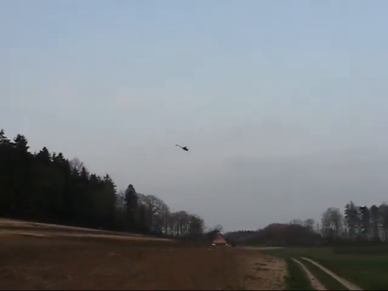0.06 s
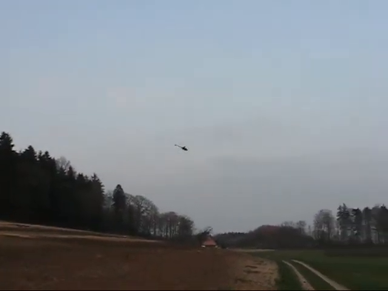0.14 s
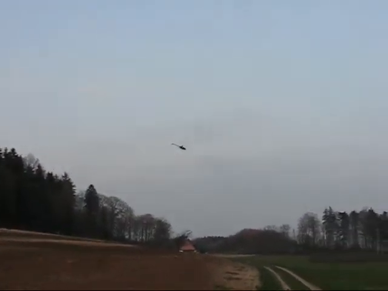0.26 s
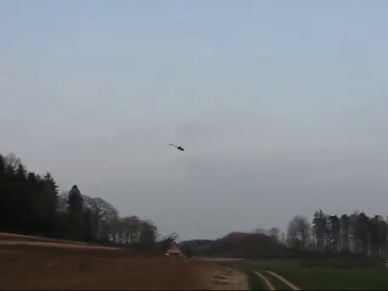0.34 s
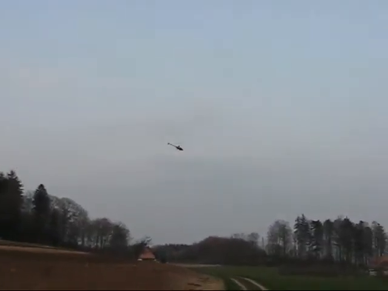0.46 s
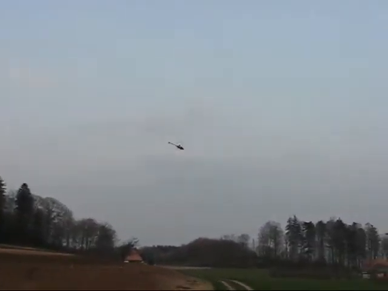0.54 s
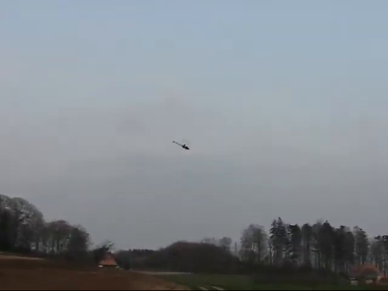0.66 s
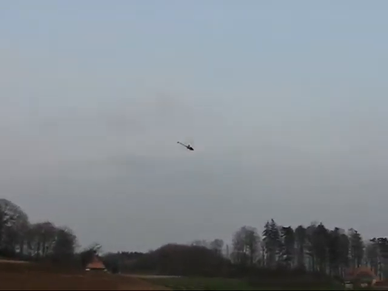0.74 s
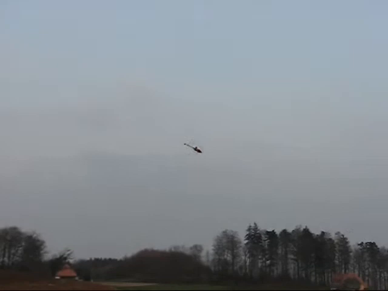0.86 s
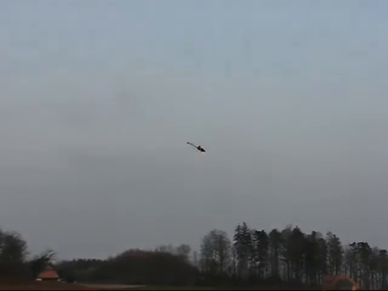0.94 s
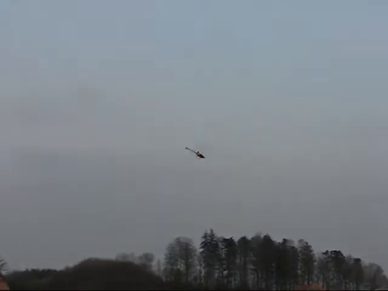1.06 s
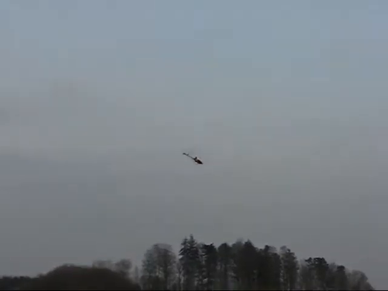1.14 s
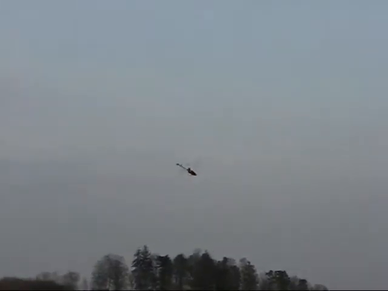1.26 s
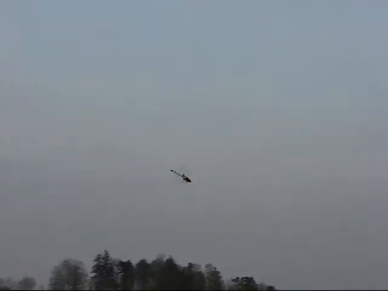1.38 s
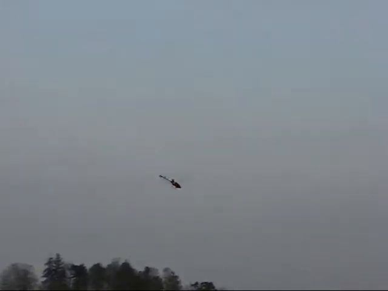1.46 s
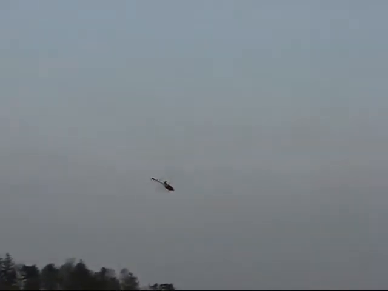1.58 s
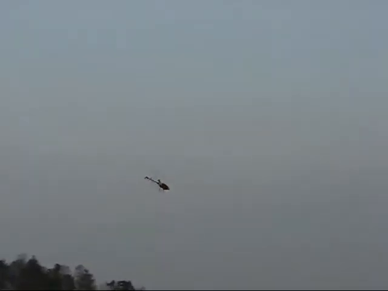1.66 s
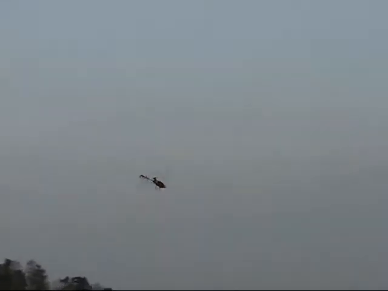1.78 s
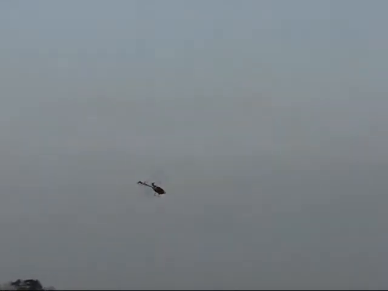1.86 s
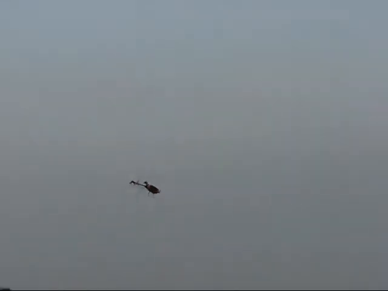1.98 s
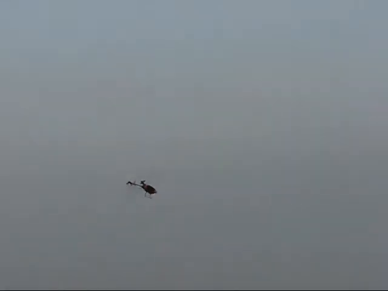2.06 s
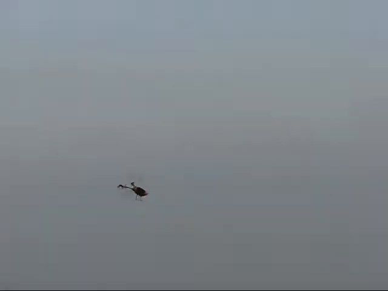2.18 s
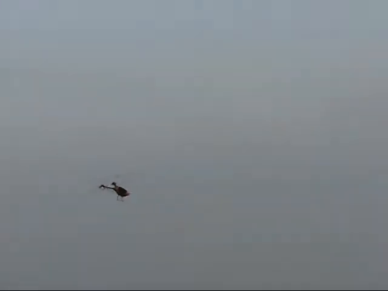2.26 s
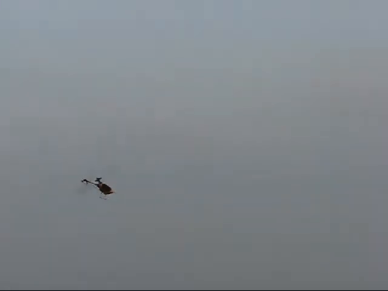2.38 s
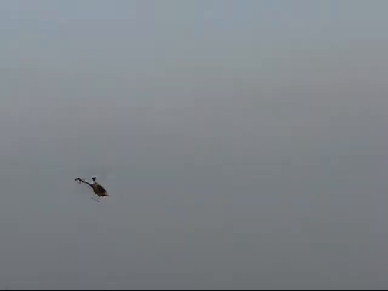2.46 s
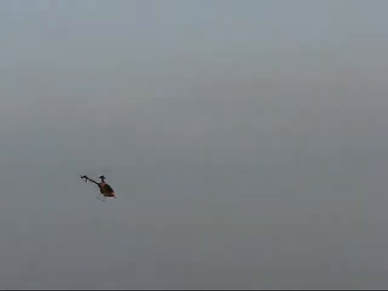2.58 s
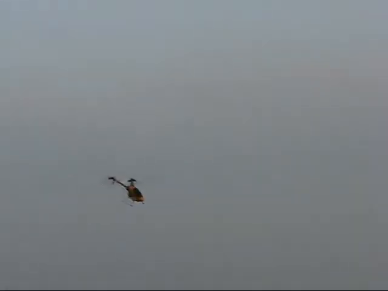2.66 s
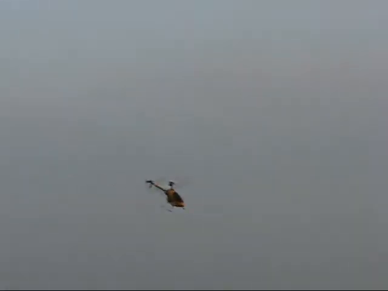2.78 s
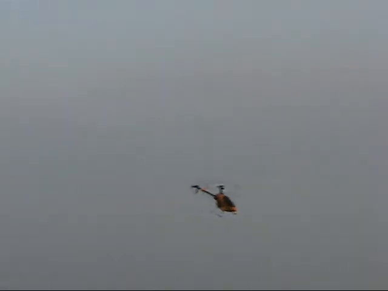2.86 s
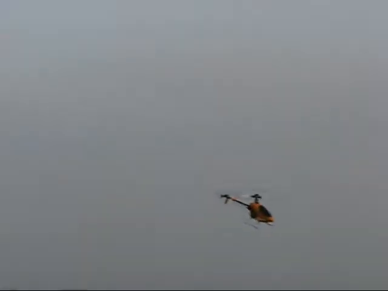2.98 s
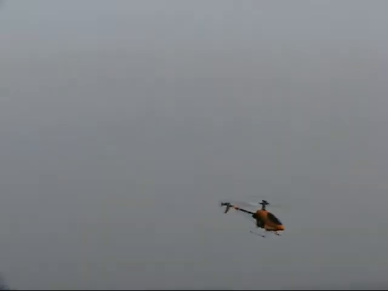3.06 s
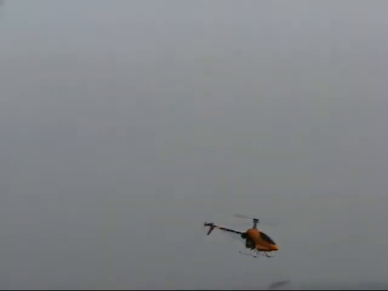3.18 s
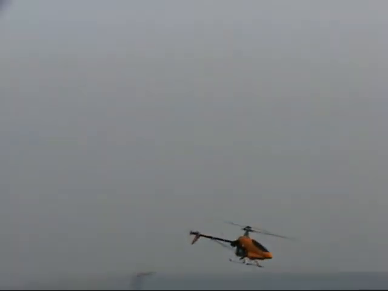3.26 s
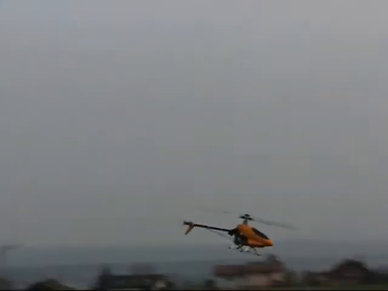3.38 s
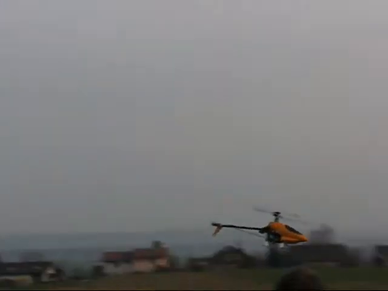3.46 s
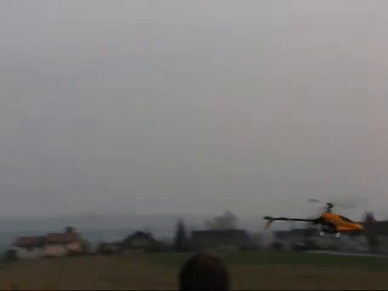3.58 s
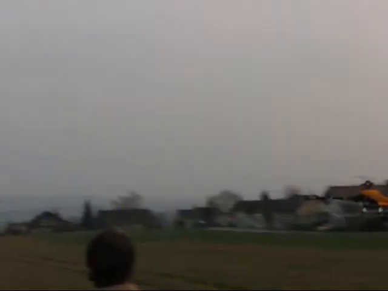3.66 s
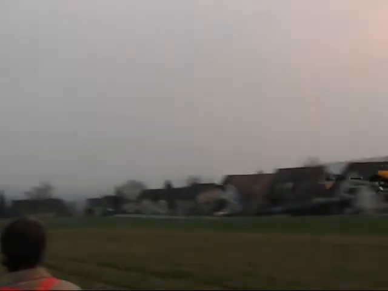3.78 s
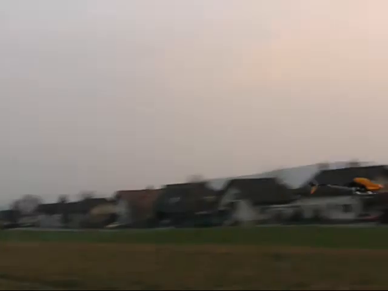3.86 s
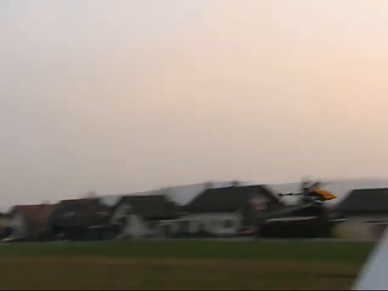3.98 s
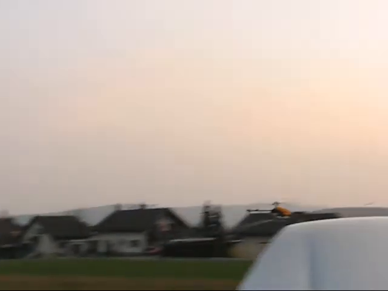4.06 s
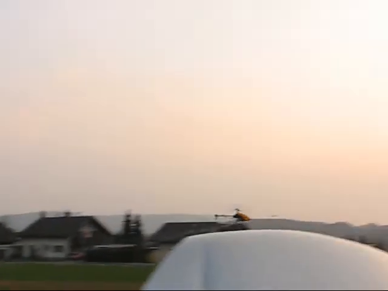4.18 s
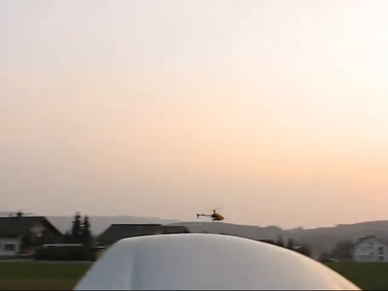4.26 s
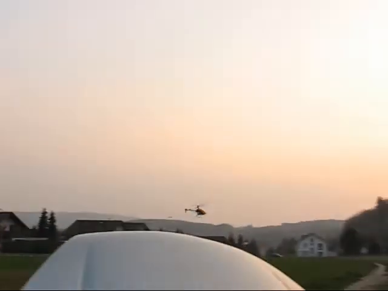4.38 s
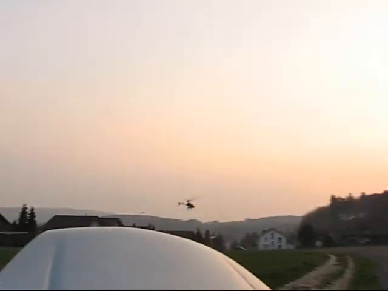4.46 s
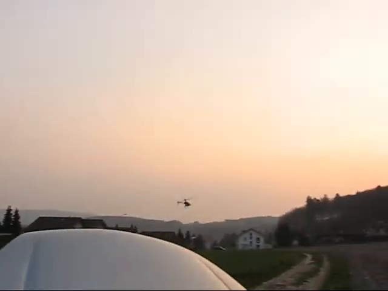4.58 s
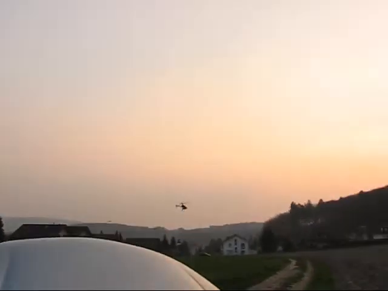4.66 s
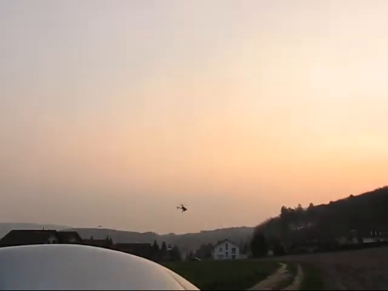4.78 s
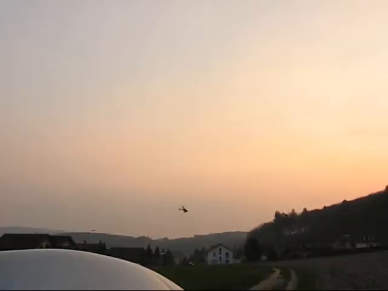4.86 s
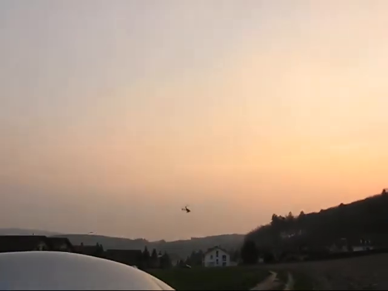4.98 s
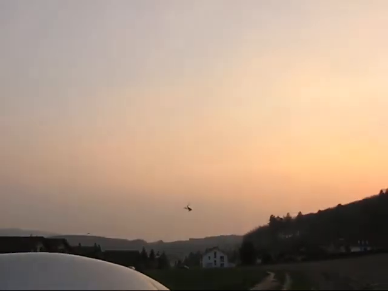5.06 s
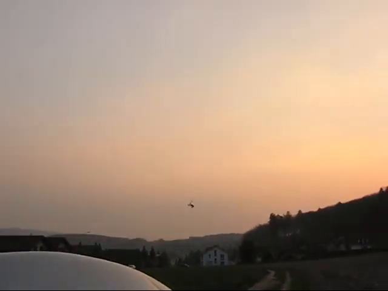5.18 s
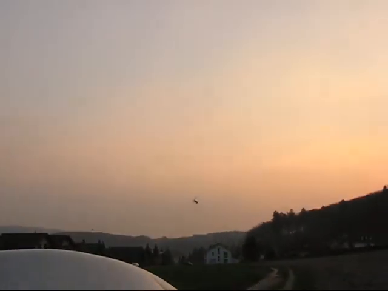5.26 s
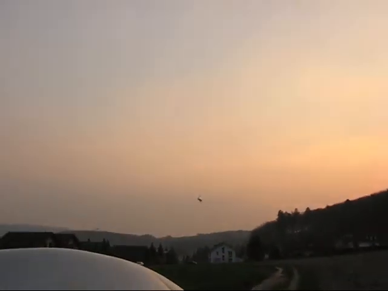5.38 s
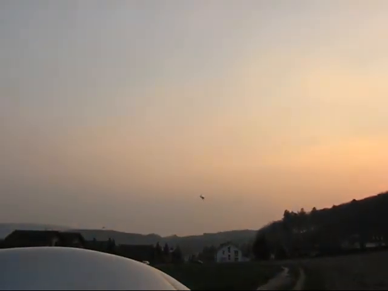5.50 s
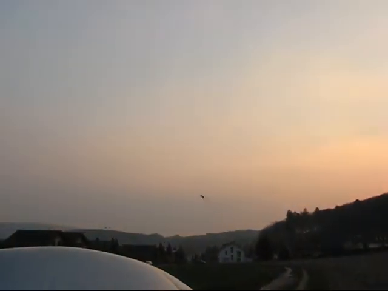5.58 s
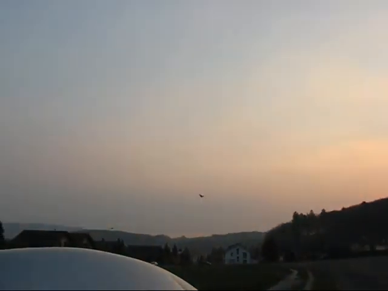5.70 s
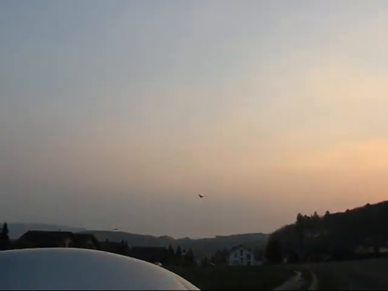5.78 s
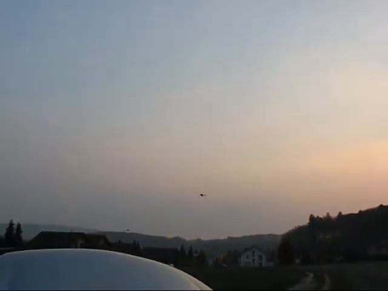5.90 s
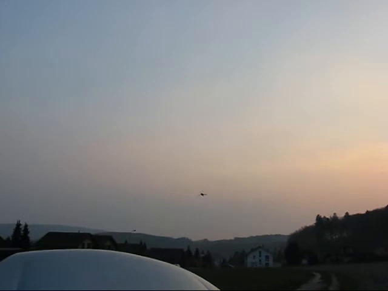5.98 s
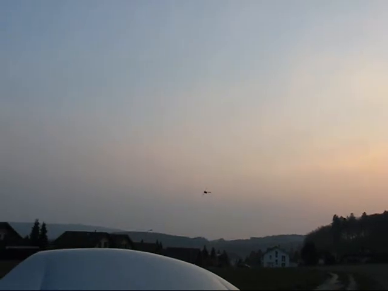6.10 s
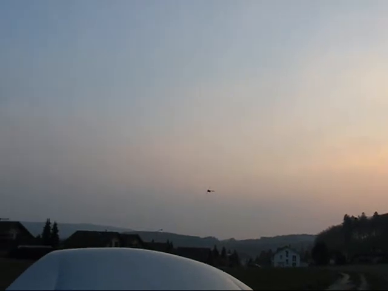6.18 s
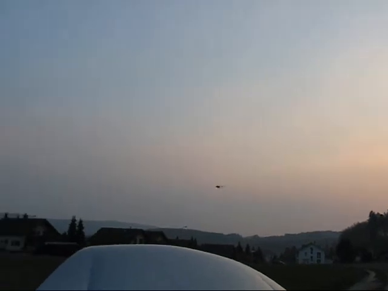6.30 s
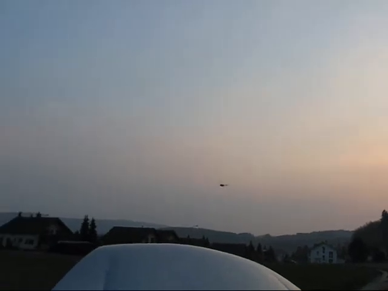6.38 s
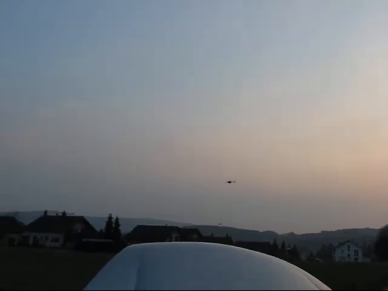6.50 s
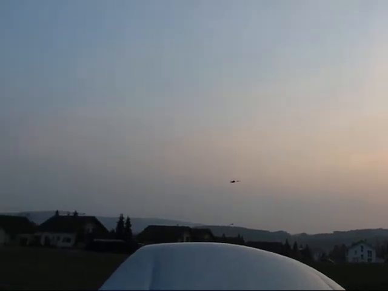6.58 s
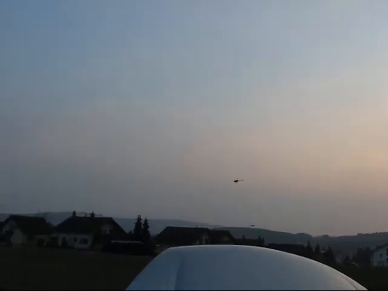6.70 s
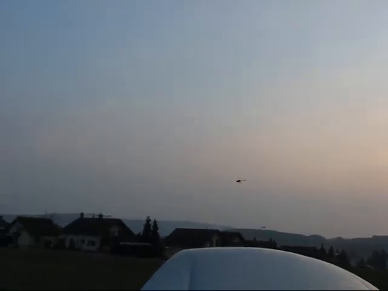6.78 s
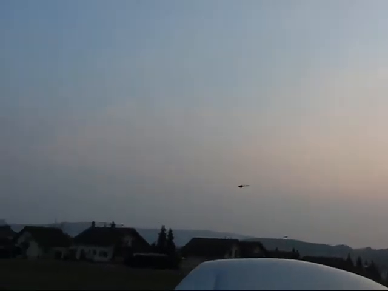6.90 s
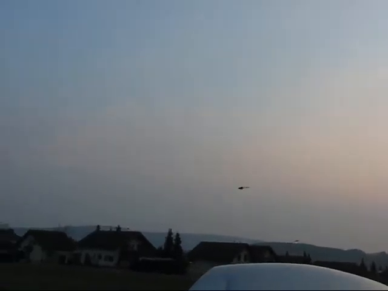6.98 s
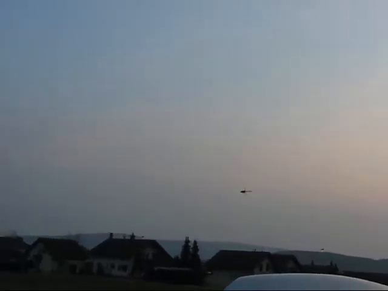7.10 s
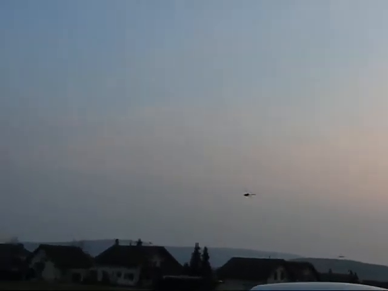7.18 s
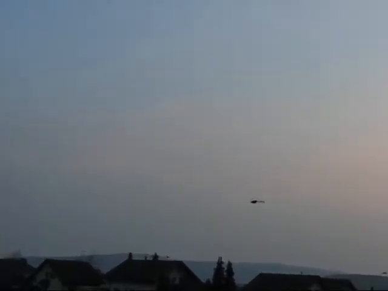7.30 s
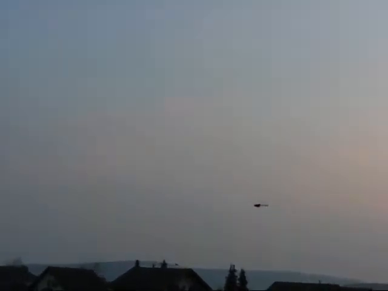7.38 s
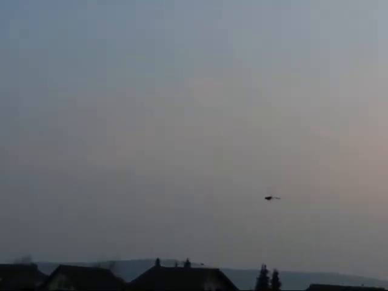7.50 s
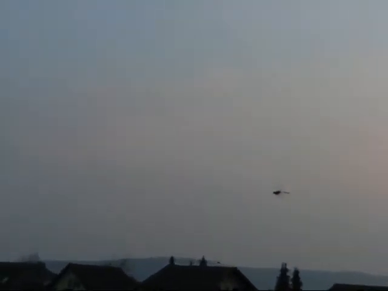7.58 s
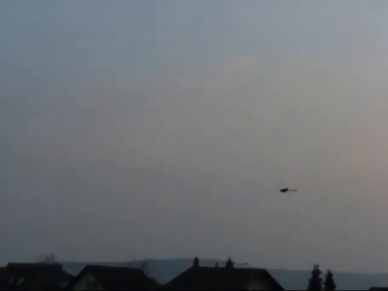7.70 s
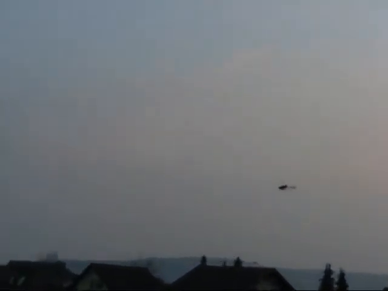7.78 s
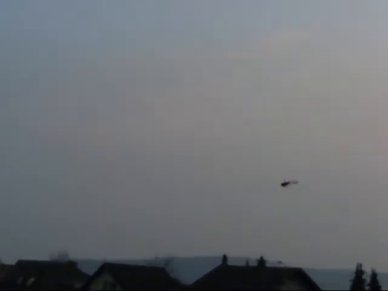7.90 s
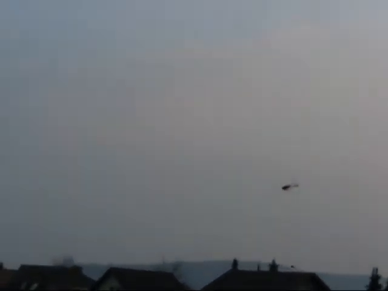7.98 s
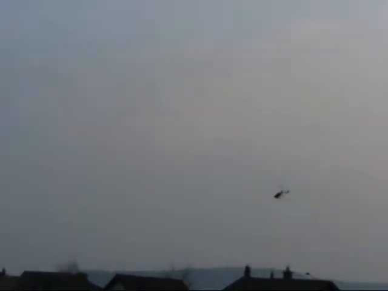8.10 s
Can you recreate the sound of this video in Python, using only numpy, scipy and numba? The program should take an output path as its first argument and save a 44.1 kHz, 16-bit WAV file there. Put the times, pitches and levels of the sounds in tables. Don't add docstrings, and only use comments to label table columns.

```python
import sys
import numpy as np
from scipy import signal
from scipy.fft import rfft, irfft, next_fast_len
from scipy.io import wavfile
from scipy.ndimage import uniform_filter1d
from numba import njit

SR = 44100
rng = np.random.default_rng(int(sys.argv[2]) if len(sys.argv) > 2 else 0)


def output_pcm(signal):
    pcm = np.clip(np.atleast_2d(signal).T, -1, 1) * 32767
    wavfile.write(sys.argv[1], SR, np.round(pcm).astype(np.int16))


def gain_from_db(level_db):
    decades = np.asarray(level_db, float) / 20
    return 10 ** decades


N = 358974
STEP = 64
TICKS = np.arange(0, N + STEP, STEP)
BLADE, TAIL = .209, .953

# time in seconds, level of the rush in dB, extra treble in dB.
NEARNESS = [(0, -31, -7), (.5, -32, -0.5), (.9, -31.5, 1), (1.35, -32.5, 3), (1.8, -33, 2.5),
            (2.2, -30.5, 3), (2.6, -30.5, -1), (3.2, -24.5, -2), (3.5, -23, 1), (3.8, -25, -1),
            (4.07, -24, 0), (4.6, -30.5, 3.5), (4.95, -31, 3), (5.5, -36, -2), (6.1, -33, -0.5),
            (6.45, -35.5, -3.5), (7, -34.5, 1.5), (8.14, -36, 1.5)]


def fine(control):
    return np.interp(np.arange(N), TICKS, control)


def curves(table):
    seconds, *columns = np.transpose(table)
    return [np.interp(TICKS / SR, seconds, column) for column in columns]


def walk(rate):
    hold = int(SR / STEP / rate)
    held = np.repeat(rng.standard_normal(len(TICKS) // hold + 1), hold)
    slewed = uniform_filter1d(uniform_filter1d(held, hold), hold)
    return 1.16 * slewed[:len(TICKS)]


def lobes(table, under_db):
    faint = gain_from_db(curves(NEARNESS)[0] - under_db)
    levels = []
    for rows in table:
        swell = sum(gain_from_db(db) * np.exp(-((TICKS / SR - s) / half) ** 2) for s, db, half in rows)
        levels.append(20 * np.log10(faint + swell))
    return levels


@njit
def svf(x, hz, width):
    out, mid, low = np.empty(len(x)), 0., 0.
    for i in range(len(x)):
        g, damping = np.tan(np.pi * hz[i] / SR), width / hz[i]
        v = (mid + g * (x[i] - low)) / (1 + g * (g + damping))
        mid = 2 * v - mid
        low = low + 2 * g * v
        out[i] = damping * v
    return out


def unit(x):
    return x / np.sqrt(np.mean(x ** 2))


def band(hz, width):
    hz = np.clip(hz + np.zeros(N), 20, .45 * SR)
    once = svf(rng.standard_normal(N), hz, 1. * width)
    return unit(svf(once, hz, 1. * width))


def wide(make, hz):
    # frequency in Hz, likeness of the two ports from 0 to 1.
    likeness = [(60, 1), (640, 0.88), (1400, 1), (3100, 0.7), (5600, 0.86), (7500, 1), (9000, 0.42),
                (15000, 0.49)]
    port_hz, port_like = np.transpose(likeness)
    like = np.clip(np.interp(np.log(hz), np.log(port_hz), port_like), 0, 1)
    mid = np.sqrt((1 + like) / 2) * make()
    side = np.sqrt((1 - like) / 2) * make()
    return mid + side * np.array([[1], [-1]])


def tone(turns, order, db, flutter_db=1.61, sway=0.025, loose=1):
    drift = loose * rng.uniform(0, 2 * np.pi) + 0.035 * order * walk(30)
    side = np.tanh(sway * order) * 0.56 * walk(1.85)
    gain = np.sqrt(2) * gain_from_db(db + flutter_db * walk(12))
    angle = 2 * np.pi * order * turns + fine(drift)
    centre = fine(gain) * np.sin(angle)
    return centre + fine(gain * side) * np.cos(angle + .5) * np.array([[1], [-1]])


def ground(x):
    # time in seconds, lag in ms.
    echo_lag = [
        (0, 2.43),
        (2.2, 2.42),
        (3.2, 2.32),
        (3.8, 1.93),
        (4.6, 2.08),
        (5.0, 2.05),
        (6.2, 2.06),
        (6.9, 2.28),
        (8.14, 2.22),
    ]
    ground_db, ground_top_hz = -6.5, 2470
    roof_ms, roof_db, roof_from_s = 1.175, -7, 6.7
    soft = signal.lfilter(*signal.butter(1, ground_top_hz, fs=SR), x)

    def late(ms):
        heard = np.arange(N) - ms * SR / 1000
        return np.array([np.interp(heard, np.arange(N), channel) for channel in soft])

    turned = np.clip((np.arange(N) / SR - roof_from_s) / .4, .15, 1)
    field = gain_from_db(ground_db) * late(fine(curves(echo_lag)[0]))
    return x + field + gain_from_db(roof_db) * turned * late(roof_ms)


def microphone_hiss():
    return gain_from_db(-56) * wide(lambda: band(11800, 5000), 13000)


def rush(turns):
    # level in dB at a nearness of -30 dB, slope in dB per dB.
    follow = [
        (-41, 0.65),
        (-30, 1.0),
        (-41, 1.46),
    ]
    # frequency in Hz, density in dB per Hz.
    rush_colour = [(30, -22), (60, -18.5), (150, -15), (300, -7), (600, -6), (1000, -3.5), (2000, -1),
                   (4500, 1), (6500, 0.5), (8500, 5), (11000, -33.5), (13500, -10), (16000, -29)]
    colour_hz, colour_db = np.transpose(rush_colour)
    near_db, treble_db = curves(NEARNESS)
    low, middle, top = (db + slope * (near_db + 30) for db, slope in follow)
    top = top + treble_db
    throb = 1 + 0.15 * np.cos(2 * np.pi * turns + 2) + 0.13 * np.cos(2 * np.pi * BLADE * turns + 2.3)
    gust = 0.19 * walk(8.4)
    out = 0
    for hz in 45 * 2 ** (np.arange(26) / 3):
        to_middle = np.clip(np.log2(hz / 600), 0, 1)
        to_top = np.clip(np.log2(hz / 4200), 0, 1)
        per_hz = (1 - to_middle) * (low - 26) + (to_middle - to_top) * (middle - 37) + to_top * (top - 29)
        tint = np.interp(np.log(hz), np.log(colour_hz), colour_db)
        db = per_hz + tint + 10 * np.log10(hz * 0.22)
        flicker = 0.5 * walk(5) + 1.45 * walk(24)
        out = out + fine(gain_from_db(db + gust + flicker)) * wide(lambda: band(hz, hz * 0.49), hz)
    return ground(out * throb)


def tips(turns):
    # time in seconds, centre in Hz, level in dB, pulsing from 0 to 1.
    swishes = [(.7, 10200, -47, .5), (1.3, 11500, -46.5, .8), (1.8, 12900, -40, 1), (2.45, 13700, -33, 0.9),
               (2.52, 13500, -47, 0.6), (2.72, 13000, -46, 0.3), (2.85, 13000, -33.5, 0.3),
               (3.2, 12450, -35.5, 0.4), (3.45, 12700, -31.5, .55), (3.8, 11200, -32, 0.1),
               (4.4, 12100, -37.5, 0), (4.7, 12000, -52, .3), (7.5, 12800, -66, 0.8),
               (7.9, 12900, -40.5, 0.9), (8.14, 13500, -50, .8)]
    azimuth_rad = 2.2
    hz, db, pulsing = map(fine, curves(swishes))
    pulsing = np.clip(pulsing, 0, 1)
    passes = BLADE * turns + azimuth_rad / (2 * np.pi) + .5
    place = passes % 1 - .5
    weaker_blade = gain_from_db(-9 * pulsing ** 3 * (passes // 1 % 2))
    puff = np.exp(-(place / 0.12) ** 2) * weaker_blade
    swish = wide(lambda: band(hz * (1 + 0.22 * place), 3500), 13000)
    return gain_from_db(db) * (1 - pulsing + 1.93 * pulsing * puff) * swish


def rotors(turns):
    # time in seconds, peak in dB, half length in seconds.
    disc_lobes = [
        [(.2, -63, 0.37), (1.0, -53, .5), (1.8, -58, .5), (2.6, -49, 0.59), (3.75, -53, 0.38), (4.4, -54, .4),
         (5.1, -60, .3), (6.5, -60, 0.65), (7.75, -62, .3)],
        [(.3, -57, 0.66), (2.5, -54, 0.38), (3.66, -54, 0.45), (5.2, -56.5, .3), (6.7, -55, 0.63),
         (7.8, -56.5, 0.64)],
        [(.6, -53, 0.36), (1.5, -48, 0.51), (2.3, -44.5, 0.6), (3.3, -54, 0.26), (6.6, -44.5, .65),
         (7.6, -55.5, 0.56)],
        [(.4, -49, 0.36), (1.3, -46, 0.72), (2.1, -43, 0.61), (3.2, -40, 0.64), (4.4, -45.5, 0.59),
         (5.2, -55, 0.22), (6.9, -54.5, 0.72), (8.1, -48.5, 0.36)],
    ]
    overtone_db = -8.5, -16, -3.5, -3, -9, -12.5, -17, -18
    beat, octave, higher, tail = lobes(disc_lobes, under_db=41)
    out = tone(turns, BLADE, beat) + tone(turns, 2 * BLADE, octave)
    out += sum(tone(turns, BLADE * k, higher + db, loose=0) for k, db in enumerate(overtone_db, 3))
    out += tone(turns, TAIL, tail - 4 + 0.71 * walk(2))
    out += tone(turns, 2 * TAIL, tail - 8 + 1.6 * walk(2.4))
    out += tone(turns, 1 + BLADE, tail - 3)
    out += tone(turns, 1 + 2 * BLADE, tail - 11 + 0.6 * walk(2.5))
    out += tone(turns, 1 - BLADE, octave - 5.5 + 1.4 * walk(1.5))
    slap = np.exp(3.6 * (np.cos(2 * np.pi * BLADE * turns + 0.21) - 1))
    return out + fine(gain_from_db(higher + 6)) * slap * ground(wide(lambda: band(830, 760), 700))


def gears(turns, hz):
    # time in seconds, peak in dB, half length in seconds.
    case_lobes = [
        [(0, -39, 0.27), (.6, -52, 0.24), (2.0, -40, 0.6), (2.95, -31.5, 0.33), (3.45, -24, 0.21),
         (4.02, -25.5, 0.16), (4.72, -30, 0.31), (6.17, -41, 0.17), (6.72, -42, 0.34)],
        [(.25, -48, 0.18), (.7, -39, 0.11), (2.7, -47, 0.36), (3.3, -31, 0.16), (3.65, -22, 0.1),
         (4.8, -35.5, 0.1), (5.92, -44, 0.45), (6.75, -45, 0.2)],
        [(0, -32, 0.068), (.5, -36, 0.15), (1.05, -33.5, 0.18), (2.95, -28.5, 0.28), (3.3, -39, 0.067),
         (3.7, -19.5, 0.1), (4.35, -31, 0.27), (5.67, -40, 0.14), (6.8, -47, 0.19)],
        [(3.31, -29, 0.51), (4.67, -37.5, .3), (6.11, -39, 0.34)],
    ]
    mesh = 26.5836, 27, 27.4183
    lower, middle, upper = mesh
    *lines, lowest = lobes(case_lobes, under_db=22.5)
    out = sum(tone(turns, k, db, flutter_db=3.5) for k, db in zip(mesh, lines))
    out += tone(turns, lower - 1, lowest, flutter_db=3.5)
    out += tone(turns, upper - 1, lines[2] - 7 + 1.6 * walk(3.6))
    out += tone(turns, middle + 1, lines[1] - 9 + 5.2 * walk(3.35))
    for k in (-2, -1, 1, 2):
        out += tone(turns, middle + k * BLADE / 2, lines[1] - 11 + 2.0 * walk(6.3))
    hiss = wide(lambda: band(middle * hz, 650), 7400)
    away_db = -6 * np.exp(-((TICKS / SR - 5.3) / 0.28) ** 2)
    strength = gain_from_db(curves(NEARNESS)[0] - 4.5 + away_db) + gain_from_db(-14) * sum(map(gain_from_db, lines))
    return out + fine(strength * gain_from_db(1.4 * walk(22))) * hiss


def cylinder_head(turns):
    # time in seconds, peak in dB, half length in seconds.
    head_lobes = [
        [(.38, -51, 0.24), (3.57, -37, 0.22), (5.13, -45.5, 0.62), (6.66, -48, 0.44), (7.72, -43, 0.32)],
        [],
        [(.38, -49.5, 0.95), (3.04, -40, 0.79)],
        [(3.08, -37.5, 0.46), (4.98, -43, 0.59), (6.03, -47, 0.25)],
        [(3.28, -40, 0.21), (4.59, -41, 0.71), (5.68, -40.5, 0.42)],
        [(.5, -49.5, 0.64), (2.5, -45.5, 0.75), (6, -47, 0.65)],
        [(3.4, -42.5, 0.96), (5.99, -39, .13)],
        [(2.0, -57, 0.46), (4.79, -40, 0.32)],
        [(3.1, -40, .17), (4.99, -45, 0.34), (5.83, -44, 0.34)],
        [(2.4, -44, .4), (3.1, -33.5, 0.32), (4.18, -38, 0.31), (4.92, -31, .29), (6.7, -46, 0.43)],
        [(3.66, -49, 0.23)],
        [(.18, -43, 0.17), (4.31, -40, 0.26)],
    ]
    levels = lobes(head_lobes, under_db=18.5)
    return sum(tone(turns, k, db + 1.53 * walk(2.48)) for k, db in zip((8, *range(10, 21)), levels))


def engine(turns):
    # time in seconds, peak in dB, half length in seconds.
    outlet_lobes = [
        [(0, -53, 0.33), (1.85, -52, 0.22), (2.6, -41.5, 0.75), (3.35, -40, 0.26), (4.45, -64, 0.34),
         (5.35, -48.5, 0.67), (7.3, -47.5, 0.55)],
        [(0, -48.5, 0.18), (2.3, -50.5, 0.67), (3.2, -43.5, 0.13), (4.65, -39, 0.47), (5.5, -45, 0.38),
         (6.2, -49, 0.43)],
        [(.39, -49.5, .3), (2.1, -37, 0.58), (2.8, -38.5, 0.28), (3.35, -34, 0.25), (4.35, -46, 0.5),
         (5.95, -51, 0.45), (6.98, -55, 0.4), (8.14, -43.5, 0.41)],
        [(2.29, -47, .55), (3.2, -45, 0.3), (4.24, -42, 0.5), (5.35, -42, .44)],
    ]
    can_lobes = [
        [(0, -41.5, .2), (.9, -40, 0.34), (1.45, -44.5, 0.17), (2.9, -39.5, 0.51), (3.75, -33, 0.27),
         (4.6, -39.5, 0.42), (6.05, -34.5, 0.49), (6.9, -48, 0.26)],
        [(.3, -37, 0.38), (1.2, -48, 0.4), (3.02, -27, 0.46), (4.45, -44.5, 0.86), (5.1, -33, 0.38),
         (5.75, -30.5, 0.3), (7, -46.5, 0.38), (7.56, -45, 0.27), (8.14, -40, 0.2)],
        [(2.05, -42, 0.46), (3.9, -35, 0.24), (4.5, -35.5, 0.41), (5.25, -37.5, 0.22), (5.9, -32.5, 0.41),
         (6.55, -38, 0.48)],
        [(.05, -33.5, 0.14), (.75, -40.5, 0.4), (1.45, -41, 0.22), (2.35, -40.5, 0.31), (3.2, -33, 0.24),
         (3.6, -30, 0.062), (4.2, -27, 0.29), (6.1, -37.5, 0.38)],
    ]
    out = sum(tone(turns, k, db) for k, db in zip((1, 2, 3, 4), lobes(outlet_lobes, under_db=25)))
    out += sum(tone(turns, k, db) for k, db in zip((5, 6, 7, 9), lobes(can_lobes, under_db=20)))
    near_db = curves(NEARNESS)[0] + 7 * np.exp(-((TICKS / SR - 4.9) / 1.3) ** 2)
    for k in (*range(21, 27), *range(29, 45)):
        out += tone(turns, k, near_db - 33 - 0.37 * (k - 21) + 3.7 * walk(2.94))
    return out + cylinder_head(turns)


def scene():
    # time in seconds, speed in Hz.
    shaft = [(0, 263.9), (.625, 266.9), (1.875, 276.0), (2.375, 279.5), (2.625, 282.0), (3.0, 284.9),
             (3.18, 284.7), (3.375, 281.9), (3.875, 270.8), (4.125, 267.5), (4.4, 266.5), (5.3, 270.1),
             (5.85, 267.9), (6.5, 271.7), (6.75, 274.1), (7.125, 275.8), (7.625, 282.5), (8.05, 289.0)]
    hz = fine(curves(shaft)[0])
    turns = np.cumsum(hz) / SR
    air = microphone_hiss() + rush(turns) + tips(turns)
    return air + rotors(turns) + gears(turns, hz) + engine(turns)


def roll_off(x):
    return signal.sosfilt(signal.butter(12, 15730, fs=SR, output="sos"), x)


def record(dry):
    # frequency in Hz, left minus right in dB.
    port_db = [(0, -0.06), (1400, 0.5), (3400, -4.5), (4800, -1.5), (6300, 2.5), (8300, 1), (10400, -6),
               (13200, 5), (15500, 6)]
    # frequency in Hz, lead of the left port in radians.
    port_rad = [(0, 0.13), (2000, -0.39), (3400, -0.24), (5500, 1), (6900, -0.64), (9000, -0.91),
                (11700, 1), (14500, 0.23)]
    size = next_fast_len(N)
    hz = np.arange(size // 2 + 1) * SR / size
    db = np.interp(hz, *np.transpose(port_db))
    rad = np.interp(hz, *np.transpose(port_rad))
    half = gain_from_db(db / 2) * np.exp(.5j * rad)
    top = 1 / np.sqrt(1 + (hz / 15200) ** 40)
    mix = irfft(rfft(dry, size) * top * np.array([half, 1 / half]), size)[:, :N]
    return roll_off(mix)


dry = scene()
out = record(dry)
output_pcm(out)
```